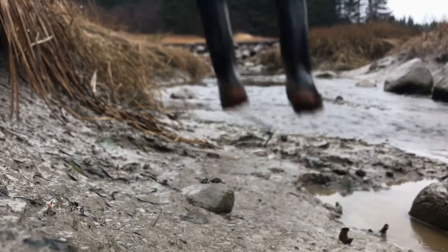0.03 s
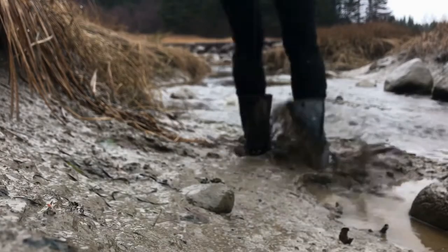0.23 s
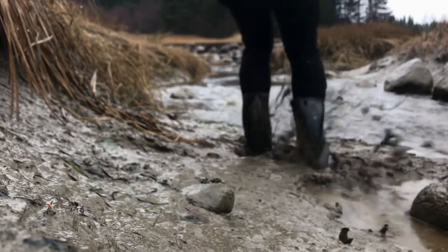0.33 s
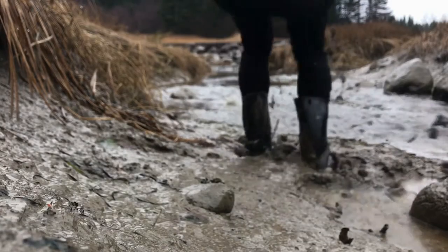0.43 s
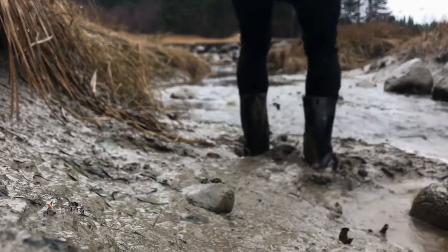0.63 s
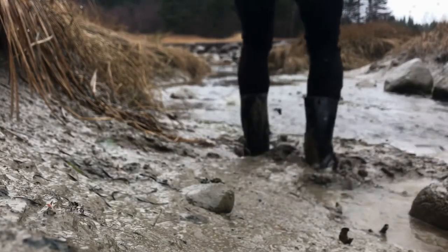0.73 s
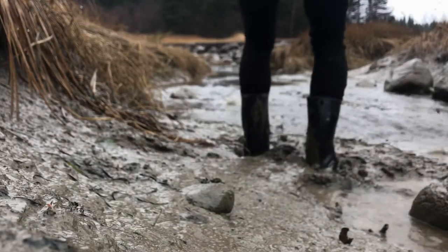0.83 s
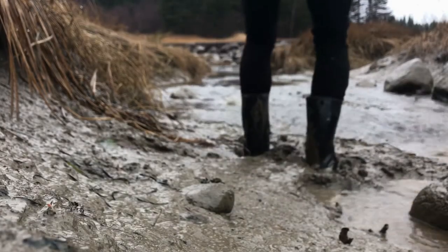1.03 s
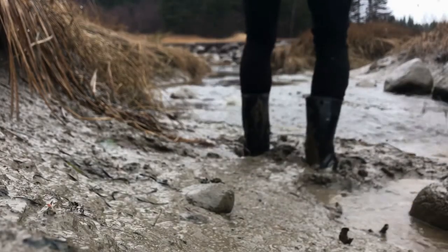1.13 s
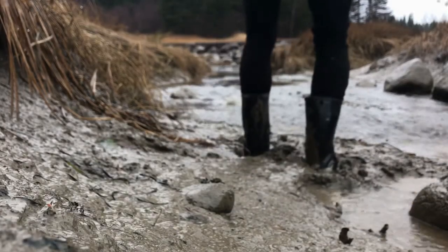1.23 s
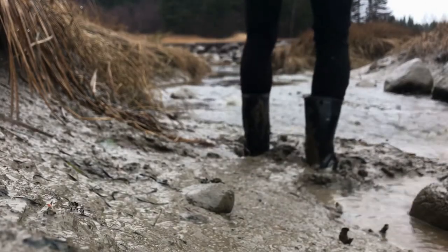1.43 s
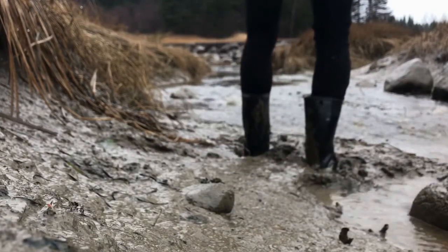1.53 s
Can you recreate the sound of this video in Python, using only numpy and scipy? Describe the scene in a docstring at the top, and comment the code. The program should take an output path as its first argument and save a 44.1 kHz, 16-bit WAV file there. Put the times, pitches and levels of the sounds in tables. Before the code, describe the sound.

Rubber boots splat hard into wet mud, then thrown drops plop and patter back down

```python
"""Over a low outdoor rumble and a faint hum, a faint whoosh leads two rubber boots into wet mud by a stream.
After a contact tick, a bright spray of tiny bubble pops darkens to a squelch, with ringing air pockets and
a low sine thud. Thrown mud and water then fall back: plopping drops are ticks, splashes and ringing bubbles,
short hisses are crackling noise, fine spatter is a rain of tiny pops. The hum swells during the fall-back."""
import sys
import numpy as np
from scipy import signal
from scipy.io import wavfile
from scipy.ndimage import uniform_filter1d

SR = 44100
rng = np.random.default_rng(int(sys.argv[2]) if len(sys.argv) > 2 else 0)


def voltage_ratio(level):
    """Linear amplitude factor for a level in decibels (scalar or array-like)."""
    return 10 ** (np.asarray(level, float) / 20)


def pcm_store(signal):
    """Save signal as 16-bit PCM."""
    levels = np.round(np.clip(np.atleast_2d(signal), -1, 1) * 32767)
    wavfile.write(sys.argv[1], SR, levels.astype(np.int16).T)


N = 70560
T = np.arange(N) / SR  # time axis [s]
EDGE_HZ = 9300  # top of the bubble sizes and of the finished band
GLIDE = 0.016  # upward pitch glide of every bubble


def evened(x):
    """Scales to rms 1."""
    return x / np.sqrt(np.mean(x ** 2) + 1e-20)


def smoothed(x, span):
    """Two running means over span samples turn noise into a slow, rounded drift."""
    return uniform_filter1d(uniform_filter1d(x, span), span)


def read(points, hz):
    """Reads a spectrum on a log-frequency axis."""
    f, value = np.transpose(points)
    return np.interp(np.log(hz + 1), np.log(f + 1), value)


def add(mix, s, sound):
    """Lays a sound into the mix at s seconds."""
    part = mix[round(s * SR):][:len(sound)]
    part += sound[:len(part)]


def band(x, hz, width_hz):
    """Band-pass: shifts hz down to zero, smooths twice and shifts back."""
    turn = np.exp(2j * np.pi * hz * np.arange(len(x)) / SR)
    r = np.exp(-np.pi * width_hz / SR)
    low = signal.lfilter([(1 - r) ** 2], [1, -2 * r, r * r], x / turn)
    return 2 * (turn * low).real


def grains(per_s, cycles, spread_db, colour_db, low_hz):
    """Size classes of tiny bubbles, popping at random in clumps; colour_db(hz) sets their share over time.

    per_s counts the pops in the 1 kHz class; smaller, higher bubbles pop more often in proportion.
    """
    out, power = np.zeros(N), np.zeros(N)
    for hz in np.geomspace(low_hz, EDGE_HZ, num=36):
        u = np.arange(0, 4 * cycles / hz, 1 / SR) * hz / cycles
        pop = u * u * np.exp(-4 * u) * np.sin(2 * np.pi * cycles * u * (1 + GLIDE * u))
        chance = rng.random(N)
        size = np.minimum(rng.exponential(1, N), 4)
        train = (chance < per_s * hz / 1000 / SR) * voltage_ratio(spread_db * size) * rng.choice([-1., 1.], N)
        share = voltage_ratio(colour_db(hz)) * np.sqrt(hz)  # classes widen with pitch
        out += share * signal.oaconvolve(evened(train), pop / np.linalg.norm(pop))[:N]
        power += share ** 2
    # all bubble sizes swell together in clumps
    clump_db, clump_s = 1.5, .004
    clumps = voltage_ratio(clump_db * evened(smoothed(rng.standard_normal(N), round(clump_s * SR))))
    return out / np.sqrt(power) * evened(clumps)


def hiss(level_db, hz, length_s):
    """Unevenly sized noise impulses in a band make a crackling burst: sharp start, bell-shaped fade."""
    t = np.arange(0, 2 * length_s, 1 / SR)
    crackle = (rng.standard_normal(4000) * rng.exponential(1, 4000))[:len(t)]
    fade = np.exp(-(t / length_s) ** 2 * 1.76)
    return voltage_ratio(level_db) * evened(band(crackle, hz, 0.53 * hz)) * fade


def plop(level_db, hz, ring_s, tick_db):
    """A tick as the surface breaks, a splash, and a bubble that starts at once, rings unsteadily and fades."""
    hold_share, wobble_depth = 0.43, 0.51  # hold before the fade, as a share of ring_s
    splash_db, splash_up = -10.5, 1.53  # relative to the bubble's level and pitch
    tick_s = .000052
    t = np.arange(0, 4 * ring_s, 1 / SR)

    attack = np.minimum(2 * t * hz, 1)  # half a cycle
    fade = np.exp(-np.maximum(t / ring_s - hold_share, 0) * 0.9) * attack
    a, b = smoothed(rng.standard_normal((2, 4000)), 60)
    drift = (evened(a) + 1j * evened(b))[:len(t)]
    wobble = 1.117 + wobble_depth * np.minimum(t / ring_s, 1) * drift  # unsteadiness grows as it rings
    wobble = wobble / np.sqrt(1 + 2 * wobble_depth ** 2)
    tone = np.exp(2j * np.pi * hz * t * (1 + GLIDE * t / (4 * ring_s)))
    bubble = voltage_ratio(level_db) * fade * (wobble * tone).imag

    splash = hiss(level_db + splash_db, splash_up * min(hz, 2500), ring_s)
    splash = np.pad(splash, (0, len(t) - len(splash)))
    u = t / tick_s - 2
    tick = voltage_ratio(tick_db) * u * np.exp((1 - u * u) / 2)  # one swing down and up
    return bubble + splash + tick


def rumble():
    """A deep throb: a steady low tone plus a slow random one, so that level and pitch waver."""
    hz, steady_db, waver = 36.9, -48, 0.61
    a, b = smoothed(rng.standard_normal((2, N)), 2500)
    sway = 1 + waver * (evened(a) + 1j * evened(b))
    return voltage_ratio(steady_db) * (sway * np.exp(2j * np.pi * hz * T)).real


def air():
    """Low outdoor rumble and distant water: shaped noise whose spectrum drifts in patches."""
    # colour of the air: (frequency [Hz], level per Hz [dB])
    air_colour = [(15, -23), (36, -7.5), (64, -15.5), (120, -17), (350, -16.5), (520, -17), (800, -22),
                  (2000, -40), (9400, -52.5)]
    level_db, patch_db = -46, 4
    frames, hz = N // 512 + 5, np.fft.rfftfreq(2048, 1 / SR)
    a, b, patches = rng.standard_normal((frames, 1025, 3)).T
    patches = uniform_filter1d(patches, 8, 0)  # over frequency
    patches = evened(uniform_filter1d(patches, 6, 1))  # over time
    z = (a + 1j * b) * voltage_ratio(read(air_colour, hz)[:, None] + patch_db * patches)
    noise = signal.istft(z, nperseg=2048, noverlap=1536)[1][:N]
    return voltage_ratio(level_db) * evened(noise)


def hum():
    """Faint tones drift in pitch together, keeping their ratio, and swell in."""
    # hum tones at full swell: (frequency [Hz], level [dB])
    tones = [(168, -53.5), (340, -57.5)]
    drift_hz = 2.915  # rms, at the first tone
    swell = np.clip((T - 0.38) / 0.47, .3, 1)  # 0.3 until 0.52 s, full from 0.85 s
    wander = evened(uniform_filter1d(rng.standard_normal(N), 4000))
    drift = np.cumsum(wander) * drift_hz / SR
    out = np.zeros(N)
    for hz, db in tones:
        cycles = hz * T + drift * hz / tones[0][0]
        out += voltage_ratio(db) * np.sqrt(2) * np.sin(2 * np.pi * cycles)
    return swell * out


def spatter():
    """Countless small droplets landing all around, each a tiny bubble pop."""
    # fine spatter raining down: (time [s], level [dB])
    rain_levels = [(0.301, -31.5), (.39, -50), (0.438, -41), (.5, -51.5), (.59, -44.5), (.63, -51),
                   (0.679, -41.5), (.78, -46), (0.851, -42), (.885, -52), (1.04, -47), (1.16, -54),
                   (1.23, -47), (1.29, -53.5), (1.331, -44), (1.39, -46.5), (1.44, -53), (1.5, -47.5),
                   (1.6, -48.5)]
    # its colour: (frequency [Hz], level per Hz [dB])
    rain_colour = [(400, -17), (725, -6), (1980, -8.5), (2500, -11), (5800, -21.5), (9400, -24)]
    s, level_db = np.transpose(rain_levels)
    rain = grains(per_s=200, cycles=7, spread_db=3.8,
                  colour_db=lambda hz: read(rain_colour, hz), low_hz=451.5)
    return rain * voltage_ratio(np.interp(T, s, level_db, left=-120))


def hisses():
    """Short crackling bursts: a tick at first contact, then spray hissing down on the gravel."""
    # bursts: (time [s], level before the fade [dB], centre [Hz], length [s])
    bursts = [(.2012, -30, 4500, 0.00096), (0.41, -46.5, 4340, 0.012), (0.44, -40, 2930, 0.0056),
              (0.586, -45.5, 4100, 0.013), (0.638, -39.5, 2660, 0.0027), (0.6515, -40, 4540, 0.0042),
              (0.665, -48, 6000, 0.002), (0.772, -43, 2740, 0.045), (0.851, -42, 1980, .006),
              (0.868, -44.5, 6700, 0.0036), (.933, -47.5, 2800, 0.0097), (0.91, -39.5, 1870, 0.014),
              (.968, -48, 5600, 0.0078), (0.985, -39, 2970, 0.017), (1.025, -45, 3700, 0.018),
              (1.043, -43.5, 3880, 0.0088), (1.209, -46, 3170, 0.025), (1.198, -46, 7500, 0.0022),
              (1.219, -48, 6000, .005), (1.227, -44, 7600, .002), (1.239, -40.5, 4250, .002),
              (1.256, -46, 4940, 0.0024), (1.359, -43, 5000, 0.011), (1.481, -50.5, 4770, 0.026),
              (1.529, -49, 4600, .003)]
    out = np.zeros(N)
    for s, level_db, hz, length_s in bursts:
        add(out, s, hiss(level_db, hz, length_s))
    return out


def drops():
    """Drops falling back into the puddle, each trapping a ringing bubble."""
    # drops: (time [s], bubble level [dB], pitch [Hz], ring [s], tick level [dB])
    falling = [(0.413, -35.5, 1240, 0.0045, -36), (.424, -35, 726, 0.0072, -30.5),
               (.514, -39.5, 1950, 0.0021, -37.5), (0.5225, -35, 975, 0.0054, -37),
               (0.5444, -29.5, 1074, 0.01, -34), (0.5729, -31.5, 784, 0.0059, -39),
               (.591, -35.5, 1980, 0.0032, -44), (0.6641, -27, 1560, 0.0045, -18),
               (.688, -30, 2880, 0.0018, -46), (.7687, -36, 3170, 0.002, -44),
               (0.7847, -29, 1385, 0.0085, -46), (0.837, -38.5, 2630, 0.0033, -52),
               (.913, -33, 1083, 0.005, -30.5), (.987, -40.5, 1080, 0.0071, -33),
               (1.02, -36, 1945, 0.0033, -50), (1.045, -36.5, 1563, 0.0051, -42),
               (1.083, -34.5, 900, 0.0042, -53), (1.106, -42, 1440, 0.013, -50),
               (1.13, -40, 585, 0.01, -38), (1.206, -30.5, 551, 0.015, -41), (1.208, -38, 655, 0.011, -57),
               (1.2224, -29, 1970, 0.0047, -45), (1.313, -45, 1700, 0.0048, -43),
               (1.366, -34, 2000, 0.0066, -41), (1.395, -37.5, 495, 0.013, -53),
               (1.455, -32, 1070, 0.0054, -60), (1.488, -37.5, 1975, 0.0026, -38),
               (1.49, -37.5, 2850, 0.0069, -45), (1.572, -39, 1086, 0.0054, -43)]
    out = np.zeros(N)
    for s, level_db, hz, ring_s, tick_db in falling:
        add(out, s, plop(level_db, hz, ring_s, tick_db))
    return out


def pockets():
    """Air pockets bursting under the soles; the higher the pitch, the stronger the tick."""
    # pockets: (time [s], bubble level [dB], pitch [Hz], ring [s])
    bursting = [(0.208, -18.5, 890, .002), (0.2107, -12, 2180, 0.00083), (0.215, -11.5, 4330, 0.0021),
                (0.2178, -6.5, 3910, .002), (0.2213, -9.5, 2960, 0.0031), (.225, -7.5, 4090, 0.002),
                (0.23, -9, 2920, 0.0026), (.235, -13, 720, 0.0079), (0.2384, -12, 1734, 0.0031),
                (.253, -14, 756, 0.0097), (.266, -12.5, 1420, 0.0066), (.28, -14, 1238, 0.0046),
                (.284, -11, 590.4, 0.0076), (.29, -13, 910, 0.0025), (0.342, -31.5, 425, 0.0095),
                (.369, -26.5, 478, 0.0035), (.378, -27, 426, 0.0034)]
    out = np.zeros(N)
    for s, level_db, hz, ring_s in bursting:
        tick_db = level_db + 5 + 20 * np.log10(hz / 4000)  # 5 dB over the bubble at 4 kHz
        add(out, s, plop(level_db, hz, ring_s, tick_db))
    return out


def thud():
    """The weight arrives in the soft ground: a low sine that rises softly and dies exponentially."""
    start_s, hz, rise_s, t60_s = .235, 67, 0.021, 0.084
    t = np.maximum(T - start_s, 0)
    decay = 4 * voltage_ratio(-13.5 - 60 * t / t60_s)  # the slow rise keeps the peak well below this start
    rise = (1 - np.exp(-t / rise_s)) ** 2
    return decay * rise * np.sin(2 * np.pi * hz * t)


def whoosh_and_splat():
    """A faint whoosh before contact, then mud squeezed from under the soles: spray darkening to a squelch."""
    # level and darkness of whoosh and splat:
    # (time [s], level [dB], darkness [0 spray - 1 squelch, above 1 darker still])
    course = [(0.151, -66.5, 0.3), (.195, -45.5, 0.6), (0.2035, -44, 0.4), (0.2047, -27.5, 0.012),
              (0.211, -12, 0.24), (0.226, -10.5, 0.2), (0.239, -8, 0.32), (0.245, -11.5, 0.92),
              (0.261, -16.5, 0.61), (0.279, -18, 0.89), (.296, -16.5, 0.71), (0.307, -17, 0.75),
              (0.317, -26, 0.88), (0.334, -37.5, 1.35), (0.382, -48.5, 0.86), (.4, -64, 1)]
    # bright and dark colours of the grains: (frequency [Hz], level per Hz [dB])
    spray = [(60, -37.5), (640, -7.5), (1500, -11.5), (2300, -9.5), (3000, -10.5), (4300, -7),
             (5400, -21.5), (9400, -30)]
    squelch = [(60, -6), (240, -5), (430, -13.5), (600, -17.5), (1230, -12), (2400, -15.5), (9400, -31.5)]
    s, level_db, dark = np.transpose(course)
    dark = np.interp(T, s, dark)
    pops = grains(per_s=450, cycles=4, spread_db=3.8,
                  colour_db=lambda hz: (1 - dark) * read(spray, hz) + dark * read(squelch, hz), low_hz=72.3)
    return pops * voltage_ratio(np.interp(T, s, level_db, left=-120, right=-120))


def scene():
    """Background, crackling and falling water, and the landing, as one channel."""
    background = rumble() + air() + hum()
    small_sounds = spatter() + hisses() + drops()
    landing = pockets() + thud() + whoosh_and_splat()
    return (background + small_sounds + landing)[None]


def top_cut(x):
    """Nothing passes above the cut-off."""
    return signal.sosfilt(signal.butter(12, 9630, fs=SR, output="sos"), x)


def record(dry):
    """A soft ceiling rounds off the peaks, then a steep low-pass limits the band."""
    ceiling = .86  # full scale is 1
    rounded = dry / (1 + abs(dry / ceiling) ** 6) ** (1 / 6)
    low_pass = signal.firwin(701, EDGE_HZ, window=("kaiser", 10), fs=SR)
    limited = signal.oaconvolve(rounded, low_pass[None], "same")
    return top_cut(limited)


dry = scene()
out = record(dry)
pcm_store(out)
```